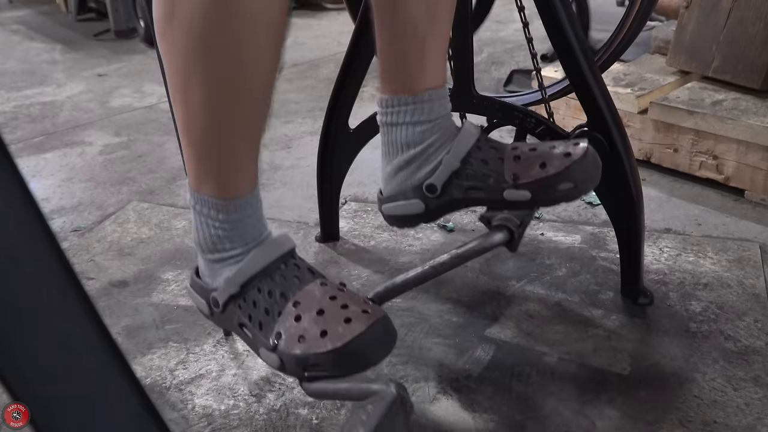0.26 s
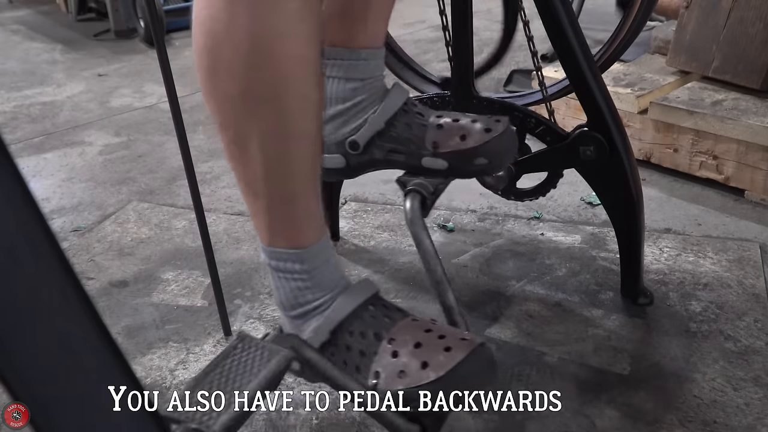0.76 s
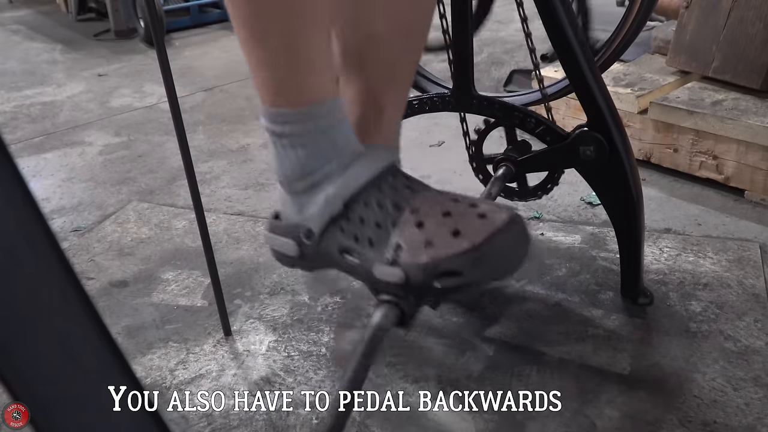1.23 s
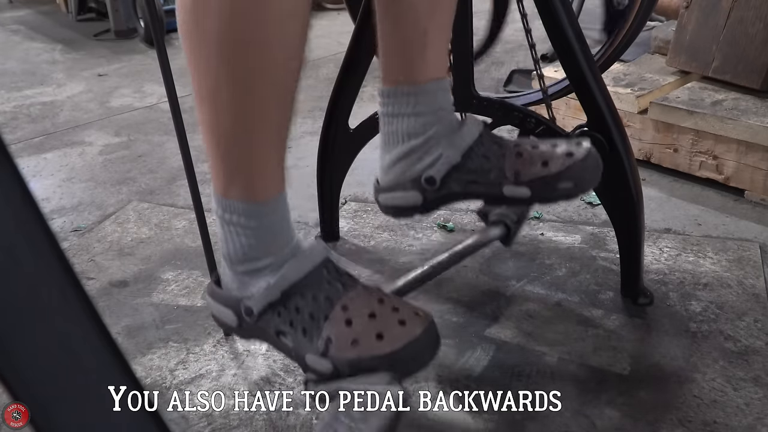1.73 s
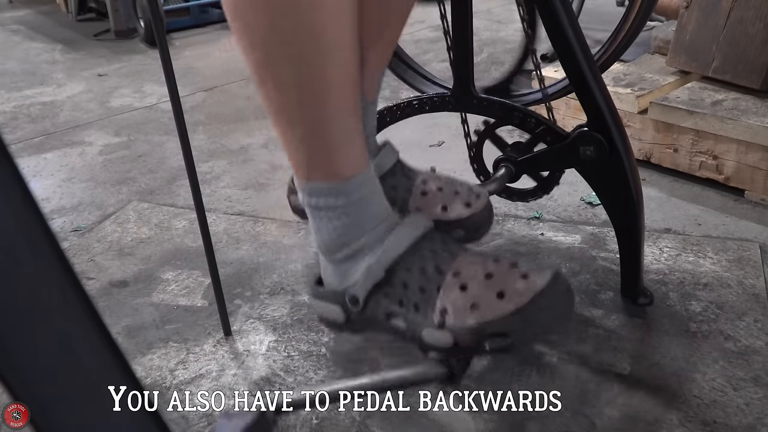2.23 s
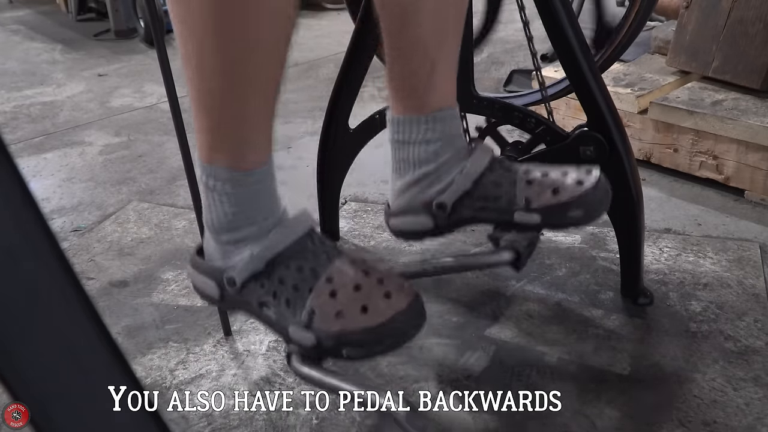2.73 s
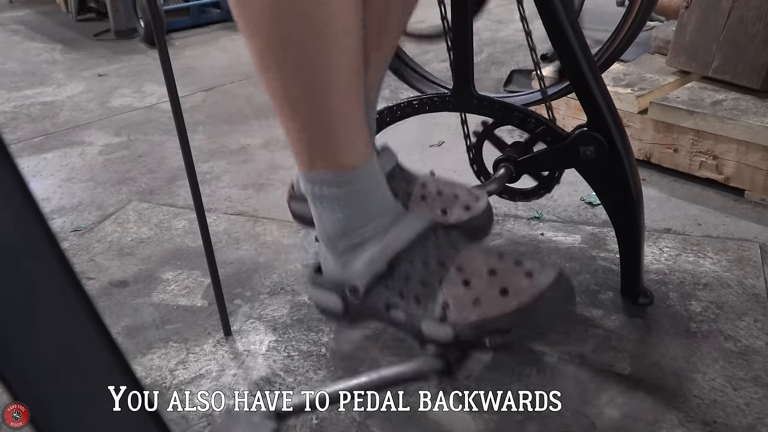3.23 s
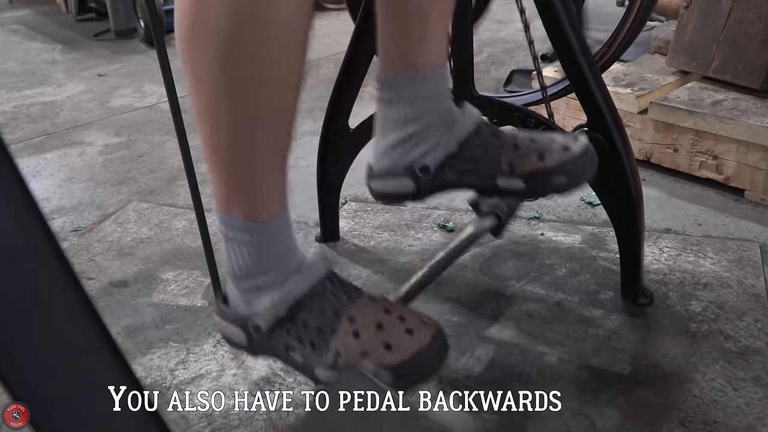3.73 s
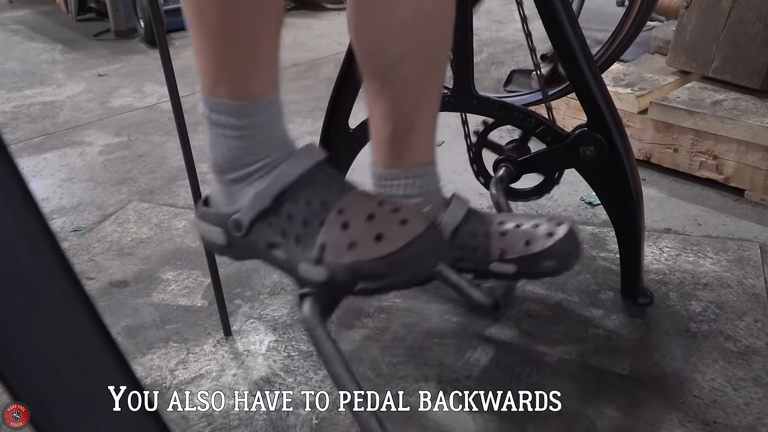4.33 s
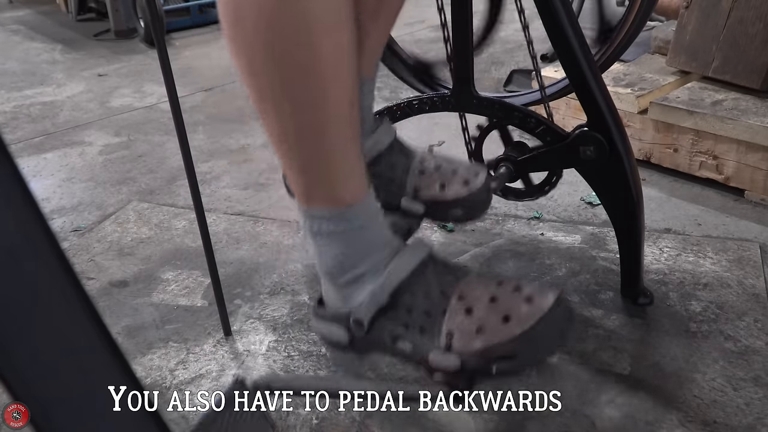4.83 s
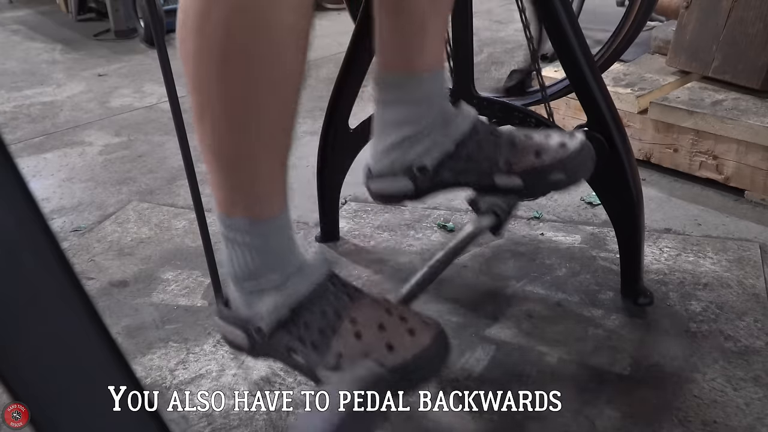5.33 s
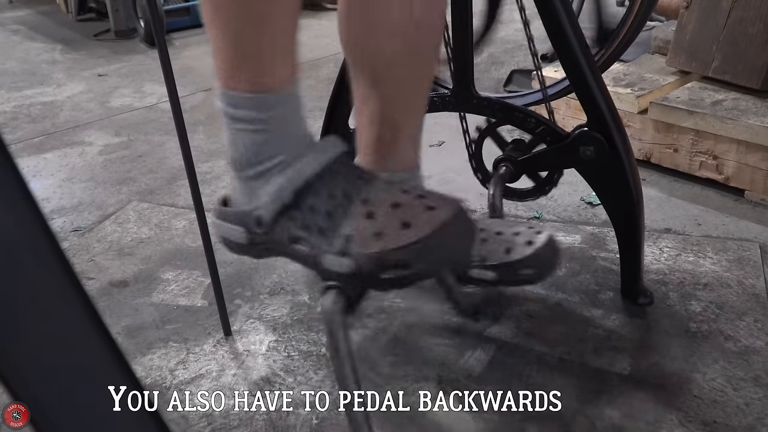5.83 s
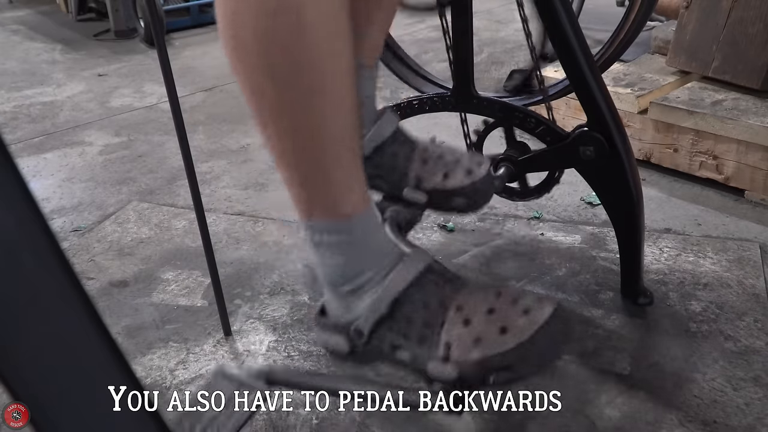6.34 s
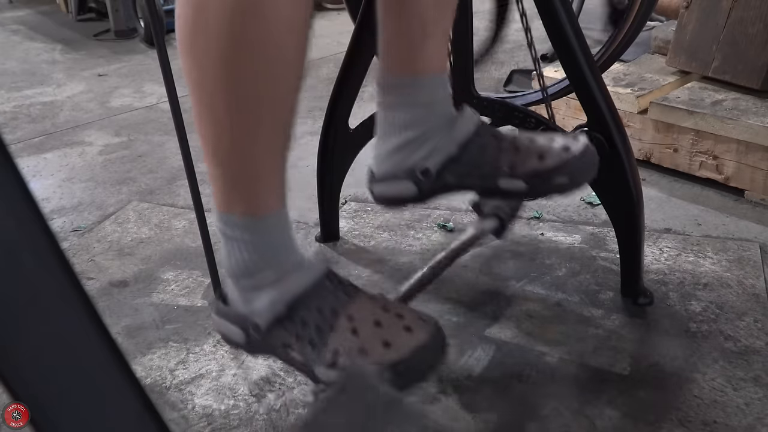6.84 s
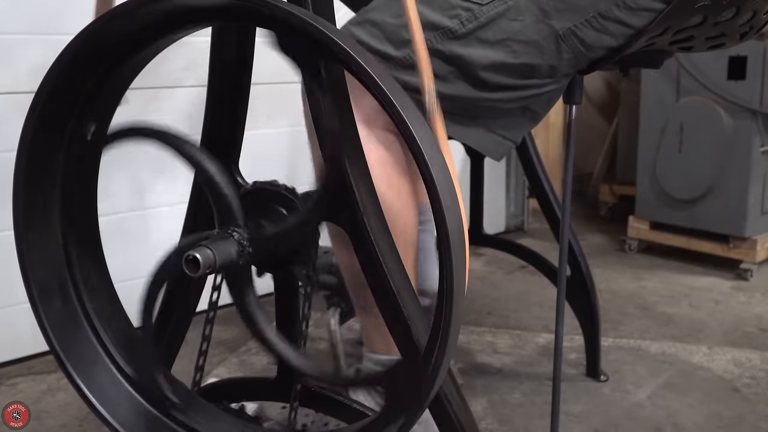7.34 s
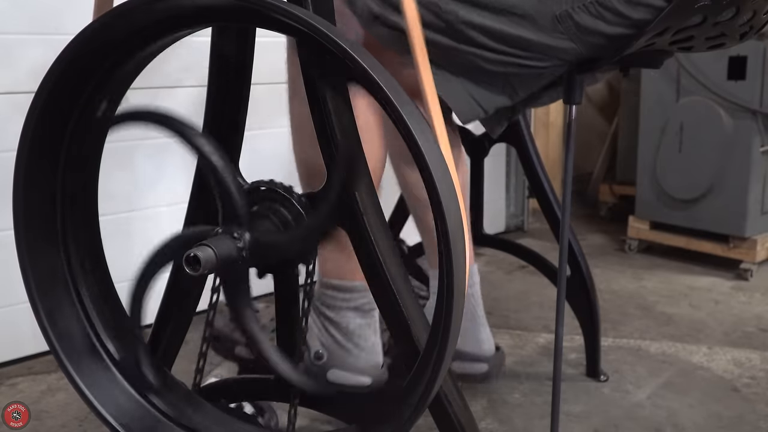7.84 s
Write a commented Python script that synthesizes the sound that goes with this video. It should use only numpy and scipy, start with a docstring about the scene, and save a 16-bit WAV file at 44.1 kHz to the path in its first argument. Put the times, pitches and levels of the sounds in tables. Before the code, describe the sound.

Close chain rattle builds from quiet ticking to rough metallic clatter with crank knocks, then switches abruptly to a fuller, steadier flywheel-side rattle.

```python
"""Chain links rattle and clink on sprockets, cranks clack and a slack chain lurches: a pedal-driven iron lathe
in a workshop. It is heard first beside the pedals, then, after a brief drop in level, beside the flywheel.
The rattle is noise coloured by chain and frame modes; single blows are short bursts of decaying modes.
Jolts swell the frame rumble, airy hiss rises and falls, dry spots rub hollowly, and the room answers the blows."""
import sys
import numpy as np
from scipy import signal
from scipy.fft import rfft, irfft, next_fast_len
from scipy.io import wavfile
from scipy.ndimage import uniform_filter1d, map_coordinates

SR = 44100
rng = np.random.default_rng(int(sys.argv[2]) if len(sys.argv) > 2 else 0)


def pcm_store(signal):
    """Save signal as 16-bit PCM."""
    levels = np.round(np.clip(np.atleast_2d(signal), -1, 1) * 32767)
    wavfile.write(sys.argv[1], SR, levels.astype(np.int16).T)


N = 355887
TIME = np.arange(N) / SR
RING_SIZE = 16384  # samples in one decaying sound
AGE = np.arange(RING_SIZE) / SR
RING_HZ = np.fft.rfftfreq(RING_SIZE, 1 / SR)
GAP_START, GAP_END = 7.037, 7.062  # s, between the two listening places

# modes of chain and sprocket, before each user's trim: [pitch_hz, level_db]
STEEL_MODES = [(1925, -24), (2420, -9), (2575, -32), (3017, -9), (3257, 0.5), (4486, -9.5), (5146, -12),
               (5688, 2.5), (7262, -10), (7550, 3), (8970, 2.5), (9500, -4)]


def amp(db):
    """The decibel law: level to amplitude ratio."""
    return 10 ** (np.asarray(db) / 20)


def unit(x):
    """Power normalisation: scale to rms 1."""
    return x / np.sqrt(np.mean(x ** 2) + 1e-20)


def along(points, hz):
    """Spectral envelope: (frequency, value) points interpolated on a log-frequency axis."""
    f, v = np.transpose(points)
    return np.interp(np.log(hz + 1), np.log(f + 1), v)


def filtered(x, response):
    """Linear filtering: the spectrum of x times a response of frequency."""
    m = next_fast_len(len(x) + 4096)
    spectrum = rfft(x, m) * response(np.fft.rfftfreq(m, 1 / SR))
    return irfft(spectrum, m)[:len(x)]


def band(hz, lo_hz, hi_hz):
    """Band-pass gain with steep skirts on both sides."""
    return ((1 + (lo_hz / (hz + 1)) ** 12) * (1 + (hz / hi_hz) ** 12)) ** -.5


def wobble(size, step):
    """Slow random fluctuation: a smooth curve with a random knot every step points."""
    knots = rng.standard_normal(int(size / step) + 4)
    return map_coordinates(knots, [np.arange(size) / step], order=2)


def add(track, s, sound):
    """Superposition: mix a sound into the track from time s."""
    part = track[max(round(s * SR), 0):][:len(sound)]
    part += sound[:len(part)]


def machine(tone, hz, steel_db=4, frame_db=5, steel_width_hz=55):
    """Modal colour: resonance peaks of chain and frame raise the lathe's broad spectral envelope."""
    # cast frame resonances, before frame_db: [pitch_hz, width_hz, level_db]
    frame_modes = [(142, 25, -1), (213, 14, 1), (438, 10, -1), (746, 35, -1), (866, 8, 3), (942, 10, 3),
                   (1352, 8, 3)]

    def peak(centre, width):
        return 1 / (1 + (2 * (hz - centre) / width) ** 2)

    steel = sum(amp(db + steel_db) ** 2 * peak(f, steel_width_hz) for f, db in STEEL_MODES)
    frame = sum(amp(db + frame_db) ** 2 * peak(f, width) for f, width, db in frame_modes)
    return amp(along(tone, hz)) * np.sqrt(1 + steel + frame)


def registers(tone):
    """Division into registers: band gains for frame, bearings, links and fizz."""
    colour = machine(tone, RING_HZ)
    edges_hz = [(55, 480), (520, 1550), (2000, 5500), (5500, 17000)]
    return [colour * band(RING_HZ, lo, hi) for lo, hi in edges_hz]


def contact(colour, fade, ripple_db, ripple_hz):
    """Noise excitation of modes: a coloured burst, with its own random ripple in the spectrum, follows fade."""
    ripple = amp(ripple_db * wobble(len(colour), ripple_hz * RING_SIZE / SR))
    noise = rng.standard_normal(RING_SIZE)
    burst = irfft(rfft(noise) * colour * ripple) * fade
    return burst * np.linalg.norm(fade) / np.linalg.norm(burst)  # same energy as fade


def knocking(rate=260, t60=0.03, even=0.45):
    """Random impulse train: uneven little knocks (rate per s), quickly dying, over an even share of power."""
    blows = (rng.random(RING_SIZE) < rate / SR) * rng.uniform(.4, 1, RING_SIZE)
    power = signal.lfilter([1], [1, -amp(-60 / SR / t60) ** 2], blows)
    return np.sqrt(even + (1 - even) * power / power.mean())


def drive(colours, links, gains):
    """Band-wise noise excitation: the frame rumbles while passing links chatter in every higher register."""
    grains = [rng.standard_normal(N), links, links, links]
    return sum(gain * rush(grain, colour) for gain, grain, colour in zip(gains, grains, colours))


def rush(noise, colour):
    """Spectral shaping: continuous noise given a colour, at rms 1."""
    grid_hz = np.linspace(0, SR / 2, len(colour))
    return unit(filtered(noise, lambda hz: np.interp(hz, grid_hz, colour)))


def chatter(rate, spread_db, colour_db, t60, even):
    """Granular noise: random small contacts, each with its own fast-dying bands, over an even share of power."""
    _, t, z = signal.stft(rng.standard_normal(N), SR, nperseg=192)
    struck = rng.random(len(t)) < rate * t[1]  # rate is in contacts per second
    sizes = struck * amp(spread_db * rng.uniform(-2, 1, len(t)))
    bands = np.clip(unit(uniform_filter1d(rng.standard_normal(z.shape), 3, 0)), -2, 1.6)
    blows = (sizes * amp(colour_db * bands)) ** 2
    power = signal.lfilter([1], [1, -amp(-60 * t[1] / t60) ** 2], blows)
    return signal.istft(z * np.sqrt(power / power.mean() + abs(even)), nperseg=192)[1][:N]


def dulled(colours, corner_hz=7500):
    """Low-pass contact spectrum: gently seating links wake few of the highest modes."""
    return [colour / np.sqrt(1 + (RING_HZ / corner_hz) ** 4) for colour in colours]


def jolting(rise_s=0.032, t60=0.35):
    """Transient loading: each jerk of the drive swells frame rumble and bearing scrape, which then ring down."""
    # jerks that shake the frame and load the bearings: [crest_s, rumble_db, scrape_db]
    jolts = [(0.075, -58.5, -77), (0.22, -54, -50), (0.92, -58.5, -48), (1.172, -42, -35),
             (1.33, -51.5, -54), (1.492, -43, -42), (1.741, -38, -36.5), (2.59, -36, -32.5),
             (2.73, -45, -41), (2.19, -60.5, -55), (3.01, -50, -45), (4.269, -58, -39), (4.4, -48, -43),
             (4.525, -33.5, -35.5), (4.779, -59, -36.5), (4.975, -50, -37.5), (5.06, -45.5, -41.5),
             (5.63, -46, -36), (5.86, -51, -48), (6.22, -45, -49), (6.49, -45, -46)]
    rumble, scrape = np.zeros(N), np.zeros(N)
    for s, rumble_db, scrape_db in jolts:
        age = TIME - s
        rise = np.exp(-(np.minimum(age, 0) / rise_s) ** 2)
        shape = rise * amp(-60 * np.maximum(age, 0) / t60)
        rumble = np.hypot(rumble, amp(rumble_db) * shape)  # powers add
        scrape = np.hypot(scrape, amp(scrape_db) * shape)
    return rumble, scrape


def pedal_gains(rattle_db, rumble, scrape):
    """Load-dependent radiation: by the pedals every register follows the pace; jolts add to the lower two."""
    # 0.82 dB of steady rumble and scrape per dB of rattle, about an ordinary rattle of -39.5 dB
    load_db = 0.82 * (rattle_db + 39.5)
    frame = np.hypot(amp(-61.5 + load_db), rumble)
    bearings = np.hypot(amp(-56 + load_db), scrape)
    return [frame, bearings, amp(rattle_db - 9.5), amp(rattle_db - 17)]


def wheel_gains(rumble_db=-43.5, scrape_db=-40.5, links_db=-37.5, fizz_db=-45, build_s=0.13):
    """Exponential build-up: by the flywheel the rumble rises and holds over steady higher registers."""
    build = 1 - np.exp(-np.maximum(TIME - GAP_START, 0) / build_s)
    return [amp(rumble_db) * build, amp(scrape_db), amp(links_db), amp(fizz_db)]


def clinks(pedal, wheel, level_db=-9.0, treble_db=1.0, body_db=-15, ring_db=-11, crack_db=-2,
           attack=0.00087, hardening=0.21, rebound_db=-9, rebound_s=0.009,
           roller_db=-11, roller_hz=12900, roller_width_hz=1000, roller_give=0.17):
    """Impact and rebound: a link strikes a sprocket with a crack and dense clash, and steel modes ring."""
    # single strikes, before the common level and treble trims: [start_s, level_db, treble_db]
    strikes = [(0.0358, -33.5, -15), (0.442, -27, -8.5), (0.835, -25.5, -16.5), (0.9315, -30, -18),
               (0.992, -39.5, 4.5), (1.106, -35, 0), (1.2538, -25, -20), (1.308, -35.5, -0.5),
               (1.387, -22, -10.5), (1.611, -29, -1), (1.6744, -37, 5), (1.7248, -24, -16),
               (1.8324, -32, -28), (1.8902, -26.5, -19), (2.0236, -27.5, -18), (2.034, -30.5, 0.5),
               (2.0454, -31, -22), (2.1459, -22, -9.5), (2.191, -30, -14), (2.2134, -32, 3),
               (2.2448, -26.5, -35), (2.304, -27, -16), (2.4066, -26.5, -11), (2.5368, -18, -3.5),
               (2.6664, -29, 1), (2.816, -27.5, -11), (2.8764, -17.5, -14.5), (3.006, -25, -8),
               (3.085, -26, -28), (3.1456, -30.5, -6), (3.2002, -27.5, -13), (3.224, -30.5, 3),
               (3.276, -32.5, -9), (3.394, -28.5, -5), (3.4998, -30.5, 0.5), (3.691, -24.5, -18),
               (3.781, -26.5, -4), (3.8316, -23.5, -2), (3.875, -24.5, -7.5), (3.967, -26, -1.5),
               (4.126, -24, -10), (4.193, -19.5, -5), (4.2151, -20, -23), (4.257, -25, -10),
               (4.295, -33, 2.5), (4.3324, -23, -21), (4.5078, -12.5, -8.5), (4.606, -26.5, -13),
               (4.659, -18.5, -22), (4.838, -28.5, -33), (4.911, -29.5, -15), (5.0696, -42, 17.5),
               (5.131, -40, 9.5), (5.212, -35.5, -1), (5.277, -38.5, 5), (5.443, -30.5, -2),
               (5.6118, -12, -1.5), (5.638, -15.5, -10), (5.752, -32, -4), (5.8466, -27, -9),
               (5.982, -35.5, 11.5), (6.248, -25.5, -7), (6.278, -41, 13.5), (6.373, -32.5, 2),
               (6.3997, -26.5, -4.5), (6.685, -22.5, -9.5), (6.821, -20, -7), (6.911, -33.5, 13.5),
               (6.9388, -32, 7.5), (7.0075, -16, -18), (7.071, -23, -4), (7.1452, -28.5, 2.5),
               (7.2332, -15.5, -20), (7.254, -19.5, -6), (7.272, -21, -13), (7.31, -24, 0),
               (7.3907, -12, -4), (7.402, -22, -19), (7.4413, -30, -6), (7.4728, -19.5, -8),
               (7.5387, -27, -3), (7.5603, -15, -9), (7.638, -30, 6), (7.7288, -15.5, -4),
               (7.8, -22.5, -0.5), (7.892, -18, -4), (7.9178, -21.5, -5), (7.971, -25, 0), (8.0265, -31, 0)]
    out = np.zeros(N)
    roller = 1 / (1 + ((RING_HZ - roller_hz) / roller_width_hz) ** 2)
    for s, db, bright_db in strikes:
        near = s < GAP_START
        _, body, links, fizz = pedal if near else wheel
        bright = amp(bright_db + treble_db)
        # a bright, glancing strike dies sooner than a dull, square one
        t60 = 0.1 * amp(-0.099 * bright_db)
        since = AGE - rebound_s * rng.uniform(0.31, 2)
        rebound = (since > 0) * amp(rebound_db - 60 * abs(since) / (t60 / 2))
        hard = amp(hardening * (db + 32.5))  # a hard strike starts faster and cracks more
        fade = amp(-60 * AGE / t60) + hard * amp(crack_db - 60 * AGE / 0.018) + rebound
        uneven_db = 5.5 if near else 3.5
        clash = contact(links, fade, uneven_db, 371.7) + bright * contact(fizz, fade, uneven_db, 448)
        # the roller's thin ring is heard only by the pedals, and grows more slowly than the blow
        give_db = roller_give * (db + bright_db + 51)
        clash = clash + near * bright * amp(roller_db - give_db) * contact(roller, fade, 6.5, 403)
        knock = amp(body_db) * contact(body, fade, 3.6, 350)
        ring = np.zeros(RING_SIZE)
        for hz, mode_db in STEEL_MODES:
            gain = amp(mode_db + rng.normal(0, 1)) * (bright if hz > 5500 else 1)
            ring += gain * np.sin(2 * np.pi * hz * rng.normal(1, 0.00576) * AGE)
        ring *= amp(-45 * AGE / t60)  # the pure modes outlast the clash
        onset = 1 - np.exp(-hard * AGE / attack)
        add(out, s, amp(db + level_db) * onset * (clash + knock + amp(ring_db) * ring))
    return out


def lurches(pedal, wheel, level_db=-7, body_db=3, treble_db=5.0, treble_dies=1.37):
    """Frequency-dependent damping: the slack chain whips in a rough, broad clash whose treble dies first."""
    # bursts of contacts, before the common trims: [start_s, level_db, body_db, treble_db, swell_s, t60_s]
    whips = [(0.196, -26.5, -9.5, -10.5, 0.0063, 0.26), (1.131, -22, -8, -15.5, 0.023, 0.38),
             (1.697, -18.5, -10, -16.5, 0.014, 0.27), (2.5464, -17, -10.5, -12.5, 0.017, 0.46),
             (2.708, -17, -20, -11.5, 0.0021, 0.23), (3.0047, -34.5, 4.5, -11, 0.0031, 0.35),
             (3.352, -24.5, -14.5, -17, 0.0046, 0.63), (3.5762, -22.5, -24, -12.5, 0.0062, 0.29),
             (4.139, -24.5, -37, -8, 0.011, 0.21), (4.485, -18, -8, -14, 0.015, 0.36),
             (4.7491, -17.5, -16, -17.5, 0.0086, 0.21), (5.537, -27, -2, -11.5, 0.0066, 0.39),
             (5.5838, -27.5, 2, -3.5, 0.008, 0.16), (7.56, -20.5, -5.5, -4, 0.019, 0.23),
             (7.7169, -16.5, -10.5, -9, 0.00093, 0.12), (7.893, -20, -6, -4, 0.018, 0.21),
             (8.0541, -20, -9.5, -2.5, 0.0055, 0.27)]
    out = np.zeros(N)
    for s, db, low_db, bright_db, swell, t60 in whips:
        _, body, links, fizz = pedal if s < GAP_START else wheel
        rise = np.minimum(AGE / max(swell, .001), 1)
        fade = rise * amp(-60 * np.maximum(AGE - swell, 0) / t60)
        clash = contact(links, fade, 3.3, 250) + amp(low_db + body_db) * contact(body, fade, 4, 120)
        sparkle = amp(bright_db + treble_db) * contact(fizz, fade ** treble_dies, 1.6, 397)
        add(out, s, amp(db + level_db) * (clash + sparkle) * knocking())
    return out


def clacks(level_db=-10, knock_db=-2.0, ring_db=-4, crack_db=0.5, width_hz=240):
    """Impact across play: a loose crank cracks against its stop, knocks hollowly, and its arm rings."""
    # play in cranks and pedals, before the common trims: [start_s, level_db, knock_pitch_hz, arm_db, t60_s]
    stops = [(0.166, -26, 1150, -17, 0.053), (0.185, -28.5, 825, 3, 0.049), (0.399, -27, 1120, -20, 0.01),
             (0.5783, -21, 1160, -8.5, 0.029), (0.6928, -26.5, 920, -3, 0.017), (1.709, -28, 730, 13, 0.57),
             (1.982, -31, 790, -20, 0.29), (2.833, -31, 766, 5, 0.059), (2.852, -27, 720, 7, 0.19),
             (3.012, -23.5, 1030, -3, 0.14), (3.086, -27, 755, -9, 0.04), (3.432, -29, 860, -2, 0.097),
             (3.732, -33.5, 900, 2, 0.15), (3.911, -23.5, 860, 8.5, 0.099), (4.311, -29, 1230, 6, 0.23),
             (4.764, -21.5, 760, -13, 0.27), (4.97, -33, 885, -12, 0.13), (5.018, -30.5, 1210, 10.5, 0.14),
             (5.034, -27, 990, 6.5, 0.16), (5.062, -25, 720, 1, 0.027), (5.073, -35, 700, 10, 0.15),
             (5.548, -20, 716, -15, 0.18), (5.611, -19.5, 756, 4, 0.33), (5.638, -16.5, 800, 5, 0.078),
             (5.814, -24, 890, -2, 0.11), (5.912, -39.5, 970, 18.5, 0.36), (6.101, -29.5, 960, -16, 0.069),
             (6.201, -30, 830, -12, 0.2), (6.241, -12.5, 1050, -4.5, 0.032), (6.481, -25, 1140, -3, 0.093),
             (6.561, -28.5, 926, 6, 0.26), (6.696, -26, 1270, 3.5, 0.13), (6.823, -29.5, 1080, -1, 0.16),
             (7.007, -14.5, 1220, 2, 0.09), (7.012, -16, 1280, 8.5, 0.12), (7.027, -17, 774, 3, 0.14)]
    # spectral envelope of the crank: [frequency_hz, level_db]
    crank_tone = [(200, -12), (450, -9), (720, 2.5), (1200, -3), (2000, -28), (3000, -16.5), (6000, -12),
                  (14000, -34)]
    # modes of a crank arm, before ring_db: [pitch_hz, level_db]
    arm_modes = [(1905, 2.5), (2120, -11)]
    out = np.zeros(N)
    damping = amp(-60 * AGE / .11)
    for s, db, pitch_hz, arm_db, t60 in stops:
        resonance = 1 + 3.9 / (1 + (2 * (RING_HZ - pitch_hz) / width_hz) ** 2)
        colour = amp(along(crank_tone, RING_HZ)) * resonance
        fade = amp(-60 * AGE / t60) + .6 * amp(-60 * AGE / .02)
        fade = fade * (1 - np.exp(-AGE / .0004))
        # the foot on the pedal damps the pure tones sooner than the clatter
        tone = fade * damping * np.sin(2 * np.pi * pitch_hz * AGE)
        knock = contact(colour, fade, 3.6, 153.0) + amp(knock_db) * tone
        arm = np.zeros(RING_SIZE)
        for hz, mode_db in arm_modes:
            gain = amp(mode_db + rng.normal(0, 1.5))
            arm += gain * np.sin(2 * np.pi * hz * rng.normal(1, 0.012) * AGE)
        crack_fade = fade * amp(-60 * AGE / 0.06)
        crack = amp(crack_db) * contact(band(RING_HZ, 1700, 2300), crack_fade, 1, 220)
        metal = crack + amp(ring_db) * fade * damping * arm
        add(out, s, amp(db + level_db) * (knock + amp(arm_db) * metal))
    # high-pass: keeps the clacks free of low thump
    return signal.sosfilt(signal.butter(2, 220, "highpass", fs=SR, output="sos"), out)


def ping(pitch_hz, t60, width=0.028, attack=0.0006):
    """Narrow-band free decay: one tight cluster of steel modes, struck and dying; width is relative to pitch."""
    colour = 1 / (1 + ((RING_HZ / pitch_hz - 1) / width) ** 2)
    fade = amp(-60 * AGE / t60) * (1 - np.exp(-AGE / attack))
    return contact(colour, fade, 5, 236)


def pings(level_db=2):
    """Free vibration: loose rollers and pins ring briefly above the rattle."""
    # single rings, before level_db: [start_s, level_db, pitch_hz, t60_s]
    loose_parts = [(1.925, -45.5, 9300, 0.42), (2.556, -35, 11600, 0.22), (3.581, -42, 11800, 0.18),
                   (4.029, -27, 2570, 0.029), (4.151, -35.5, 6700, 0.12), (4.465, -39, 7750, .04),
                   (4.508, -34, 11900, 0.13), (5.018, -28.5, 2870, 0.03), (5.069, -33.5, 6340, 0.091),
                   (5.223, -43, 12300, 0.19), (5.279, -35, 2350, 0.16), (5.408, -30, 8300, 0.023),
                   (5.921, -39, 11750, 0.13), (5.946, -34.5, 6540, 0.1), (6.42, -38, 13200, .04),
                   (6.528, -36, 7300, 0.029), (7.091, -27, 2680, 0.055), (7.27, -19.5, 5800, 0.02)]
    out = np.zeros(N)
    for s, db, pitch_hz, t60 in loose_parts:
        add(out, s, amp(db + level_db) * ping(pitch_hz, t60))
    return out


def hiss_swells(pedal, level_db=0, body_db=-8, treble_db=-7, air_hz=11000, squareness=3.3):
    """Swelling noise: an airy, rough hiss rises and falls briefly."""
    # hiss swells, before the part levels: [crest_s, level_db, length_s]
    swells = [(0.06, -51, 0.042), (0.481, -50, 0.14), (0.793, -44.5, 0.073), (1.5, -37, 0.099),
              (1.955, -39.5, 0.09), (2.516, -38, 0.1), (2.843, -41, 0.037), (3.002, -33.5, 0.06),
              (3.468, -38.5, 0.024), (3.781, -40, 0.062), (4.397, -35, 0.045), (4.665, -34.5, 0.033),
              (4.959, -36.5, 0.071), (5.367, -37, 0.07), (6.162, -38, 0.1), (6.335, -35, 0.055),
              (6.617, -41.5, 0.054), (6.903, -38, 0.069)]
    out = np.zeros(N)
    _, body, links, fizz = pedal
    airy = fizz * (1 + (RING_HZ / air_hz) ** 3)
    crest = AGE[-1] / 2
    for s, db, length in swells:
        swell = np.exp(-np.abs(2 * (AGE - crest) / length) ** squareness) * knocking()
        for part_db, colour in [(body_db, body), (-2, links), (treble_db, airy)]:
            add(out, s - crest, amp(db + level_db + part_db) * contact(colour, swell, 4, 330))
    return out


def rubs(level_db=0, width=0.22):
    """Friction-fed resonance: sliding contact at a dry spot feeds one damped, hollow resonance for a moment."""
    # dry spots in the drive: [crest_s, level_db, length_s, pitch_hz]
    dry_spots = [(0.402, -50, 0.1, 1120), (0.583, -55, 0.53, 1130), (0.74, -49, 0.13, 890),
                 (2.935, -38, 0.07, 2620), (3.944, -43.5, 0.079, 685), (4.074, -40, 0.052, 2630),
                 (4.387, -39.5, 0.1, 1440), (6.162, -31.5, 0.083, 2820), (6.487, -35.5, 0.032, 1090),
                 (6.598, -43.5, 0.044, 1010)]
    out = np.zeros(N)
    crest = AGE[-1] / 2
    for s, db, length, pitch_hz in dry_spots:
        colour = 1 / (1 + ((RING_HZ / pitch_hz - 1) / width) ** 4)
        swell = np.exp(-(2 * (AGE - crest) / length) ** 2)
        swell = swell * amp(2 * wobble(RING_SIZE, 700)) * knocking()
        add(out, s - crest, amp(db + level_db) * contact(colour, swell, 2, 121))
    return out


def frame_note(rumble, note_hz=216, note_db=-2.5, waver=0.78):
    """Modal response: each jolt rings the frame's main mode, with a slightly wandering phase (waver in rad)."""
    phase = 2 * np.pi * note_hz * TIME + waver * wobble(N, 1800)
    return amp(note_db) * rumble * np.sqrt(2) * np.sin(phase)


def wheel_ring(waver=1.8, swell_db=4):
    """Sustained modal ringing: flywheel and sprocket modes wander in phase (waver in rad) and level."""
    # modes kept ringing by the running chain, about which the level wanders: [pitch_hz, level_db]
    wheel_modes = [(143, -53.5), (942, -51.5), (2579, -42.5), (3015, -42.5), (3257, -41.5)]
    out = np.zeros(N)
    for hz, db in wheel_modes:
        gain = amp(db + swell_db * wobble(N, 700))
        out += gain * np.sin(2 * np.pi * hz * TIME + waver * wobble(N, 800))
    return out


def workshop(x, t60=0.22, dull_hz=5000):
    """Diffuse reverberation: floor and walls answer with an exponentially dying noise tail, duller on top."""
    tail = rng.standard_normal(RING_SIZE) * amp(-60 * AGE / t60) * (1 - np.exp(-AGE / 0.0063))
    tail = filtered(tail, lambda hz: 1 / (1 + 1j * hz / dull_hz))
    return signal.fftconvolve(x, tail / np.linalg.norm(tail))[:N]


def shop_rumble(level_db=-80, corner_hz=40):
    """Low-frequency ambient noise: the deep, steady background of the building."""
    return amp(level_db) * unit(filtered(rng.standard_normal(N), lambda hz: band(hz, 16, corner_hz)))


def scene(room_db=-17):
    """Superposition of sources: the lathe from two places, in mono, with a brief dip in level between."""
    # spectral envelopes at the two places: [frequency_hz, level_db]
    pedal_tone = [(24, -64), (40, -22), (112, -4.5), (171, -8), (209, -4), (256, -10.5), (345, -11.5),
                  (433, -2), (529, -10), (751, -5), (1270, -6), (2380, 11), (10700, -15), (11800, -17.5),
                  (16000, -34)]
    wheel_tone = [(24, -64), (40, -6), (91, -31), (137, 0), (276, -6), (663, 6), (751, -1.5), (918, 0.5),
                  (1760, 3), (3220, -1.5), (3650, -1), (9450, -13), (10700, -27.5), (12800, -25),
                  (16000, -38)]
    # rattle louder as the pedalling picks up, softer when it eases: [time_s, rattle_db]
    pedalling = [(0.0, -50.5), (0.68, -48.5), (1.2, -36.5), (2.3, -41), (2.75, -39.5), (3.31, -43.5),
                 (3.37, -40), (4.7, -34.5), (4.88, -42.5), (5.3, -36), (6.35, -38.5), (6.65, -40),
                 (7.0, -40.5)]
    pedal, wheel = registers(pedal_tone), registers(wheel_tone)
    rattle_db = np.interp(TIME, *np.transpose(pedalling))
    near_links = chatter(rate=170, spread_db=3, colour_db=6.5, t60=.045, even=.08)
    far_links = chatter(rate=120, spread_db=3, colour_db=4.5, t60=.03, even=.6)
    rumble, scrape = jolting()
    by_pedals = drive(dulled(pedal), near_links, pedal_gains(rattle_db, rumble, scrape))
    by_pedals = by_pedals + frame_note(rumble)
    by_wheel = drive(wheel, far_links, wheel_gains()) + wheel_ring()
    hits = clinks(pedal, wheel) + lurches(pedal, wheel) + clacks() + pings()
    mono = np.where(TIME < GAP_START, by_pedals, by_wheel) + hits
    mono = mono + hiss_swells(pedal) + rubs() + amp(room_db) * workshop(hits) + shop_rumble()
    # the gap drops by 48 dB at once and recovers to 14 dB down at its end
    gap = (TIME > GAP_START) & (TIME < GAP_END)
    gap_gain = amp(np.interp(TIME, [GAP_START, GAP_END], [-48, -14]))
    mono = mono * np.where(gap, gap_gain, 1)
    return np.array([mono, mono])


def record(dry, low_hz=62, top_hz=16000):
    """Band limitation: a high-pass thins the deep bass and nothing passes above top_hz."""
    thin = signal.sosfilt(signal.butter(2, low_hz, "highpass", fs=SR, output="sos"), dry)
    return np.array([filtered(channel, lambda hz: hz < top_hz) for channel in thin])


dry = scene()
out = record(dry)
pcm_store(out)
```